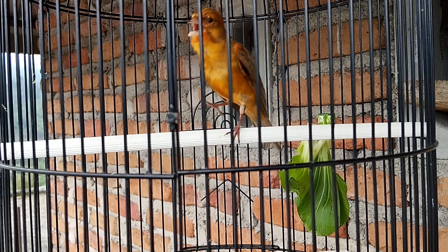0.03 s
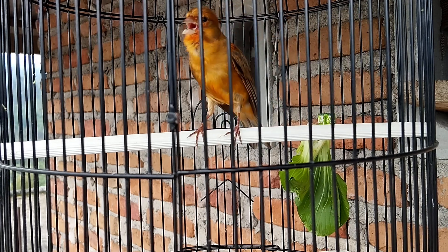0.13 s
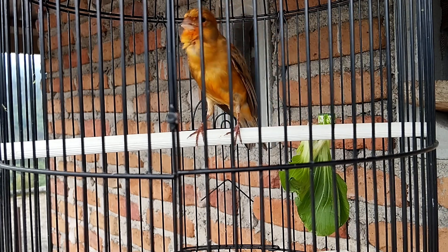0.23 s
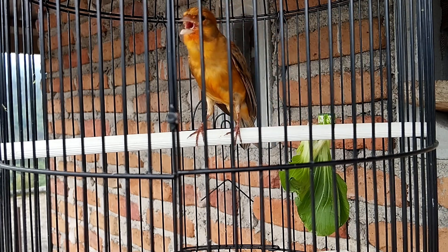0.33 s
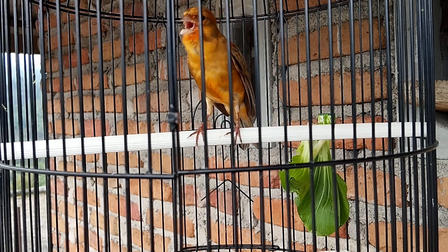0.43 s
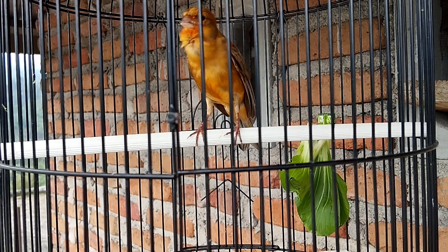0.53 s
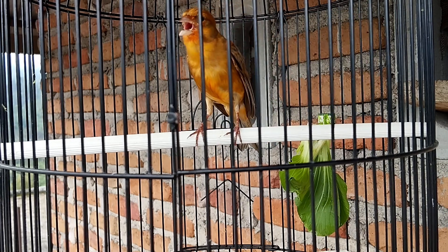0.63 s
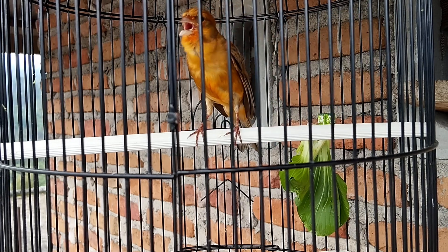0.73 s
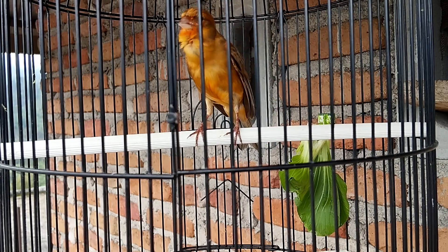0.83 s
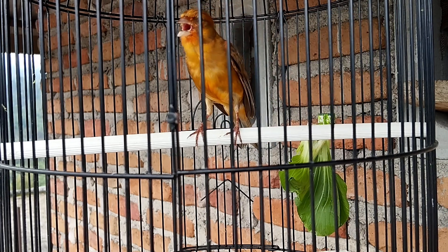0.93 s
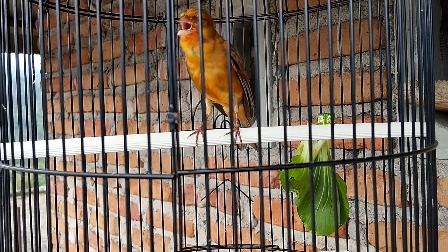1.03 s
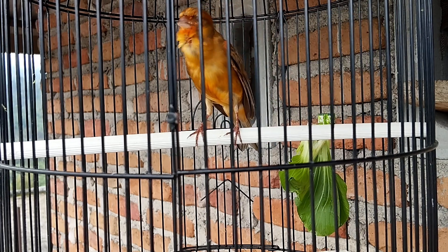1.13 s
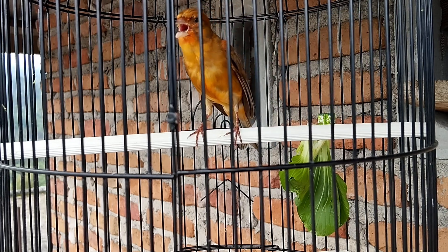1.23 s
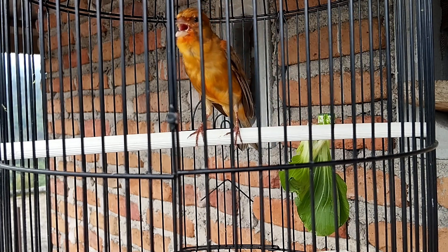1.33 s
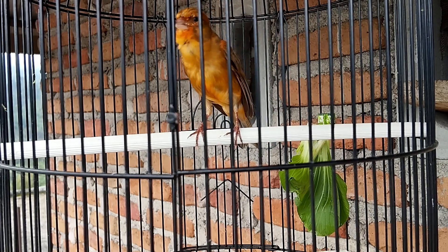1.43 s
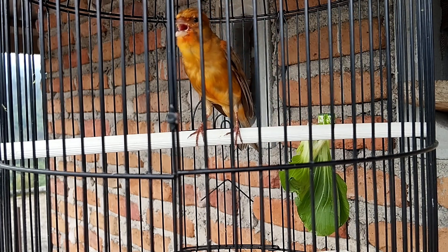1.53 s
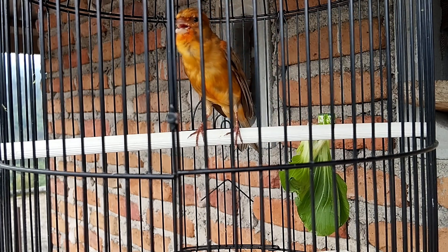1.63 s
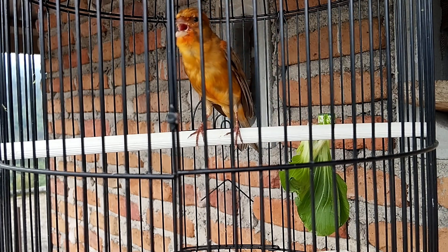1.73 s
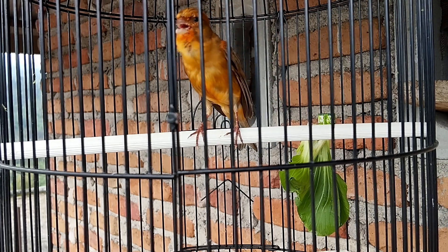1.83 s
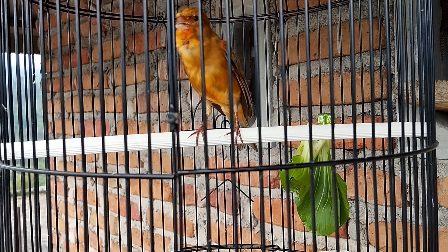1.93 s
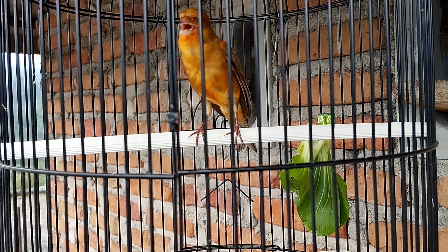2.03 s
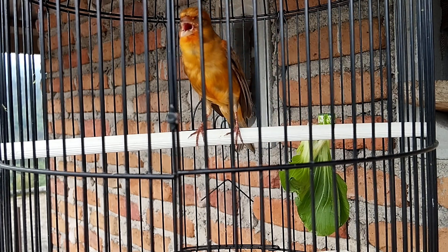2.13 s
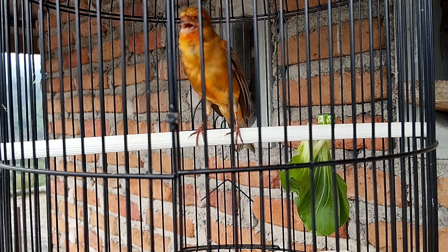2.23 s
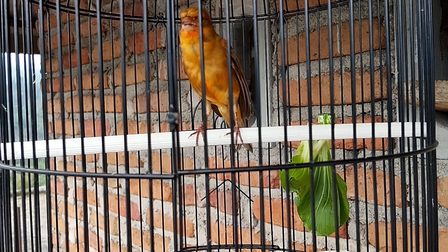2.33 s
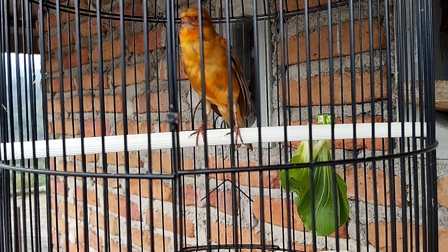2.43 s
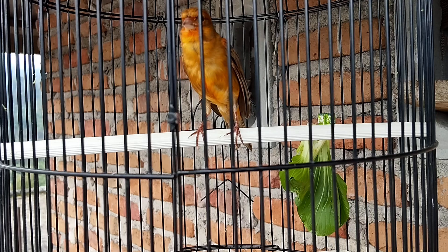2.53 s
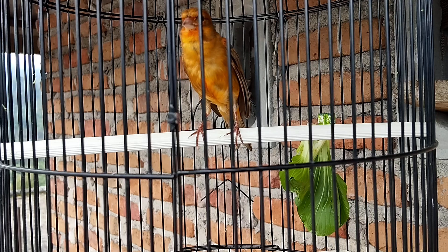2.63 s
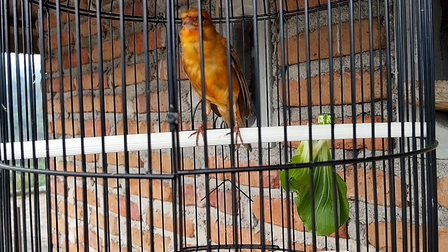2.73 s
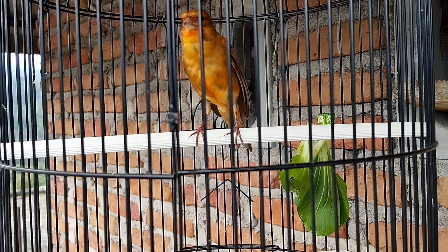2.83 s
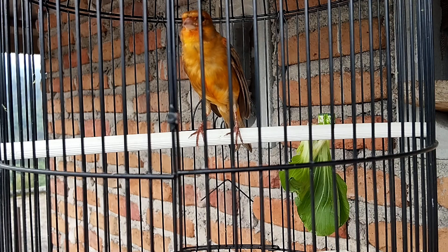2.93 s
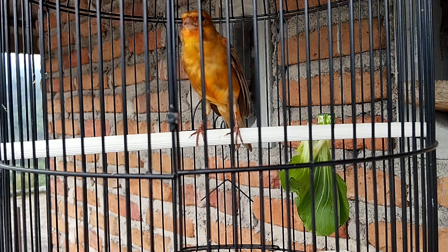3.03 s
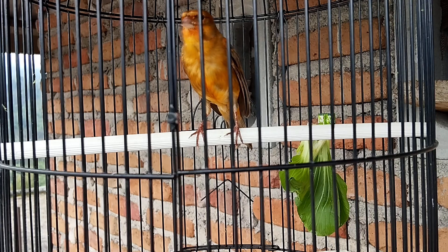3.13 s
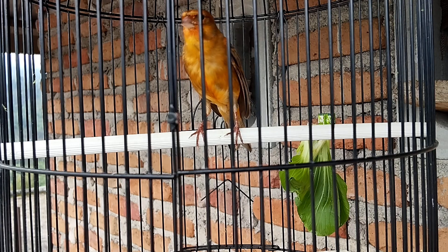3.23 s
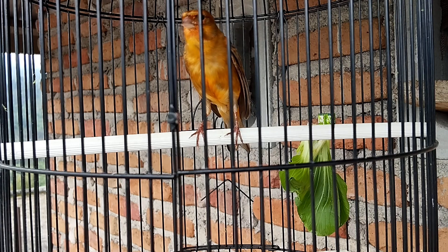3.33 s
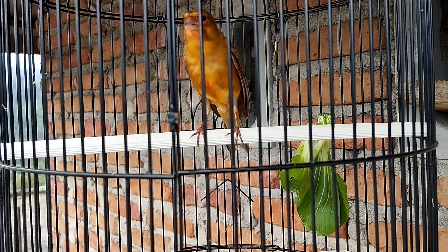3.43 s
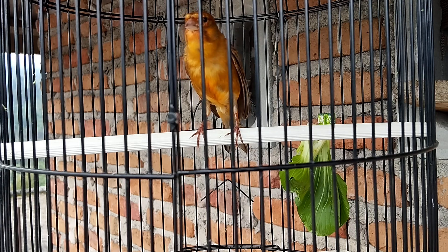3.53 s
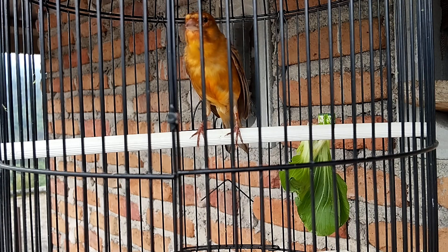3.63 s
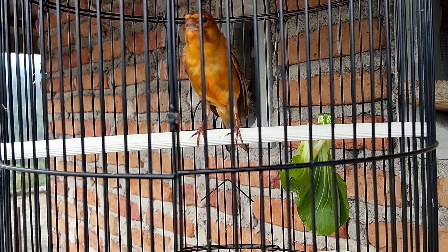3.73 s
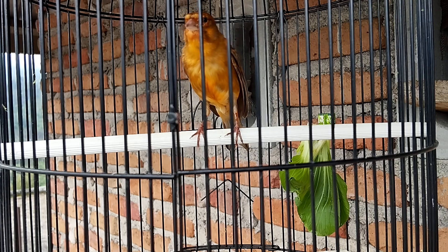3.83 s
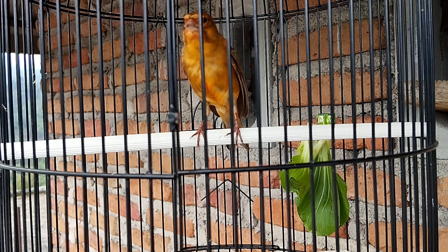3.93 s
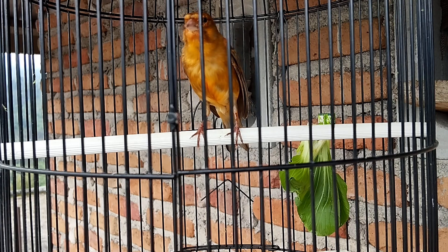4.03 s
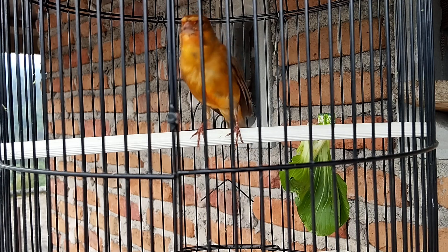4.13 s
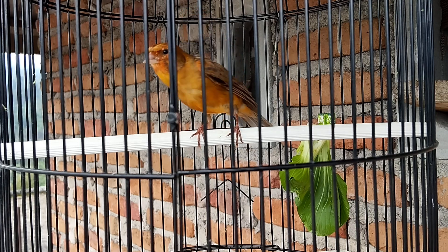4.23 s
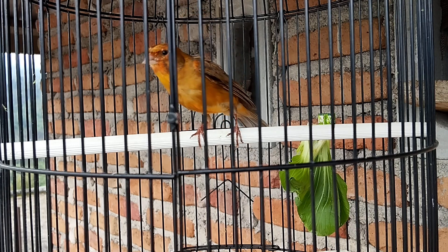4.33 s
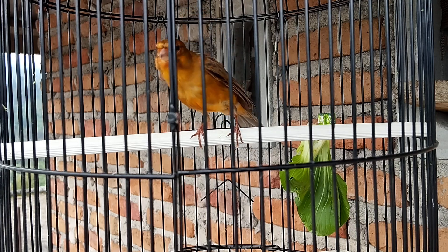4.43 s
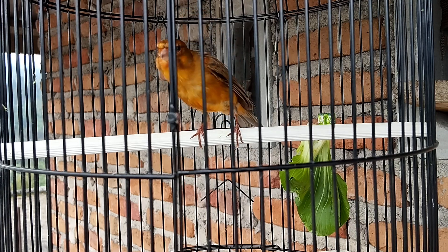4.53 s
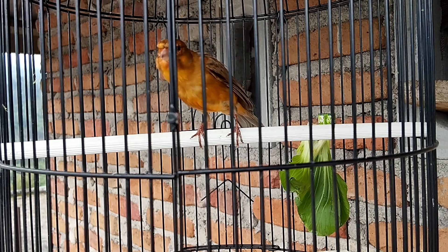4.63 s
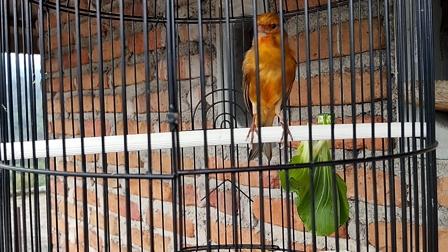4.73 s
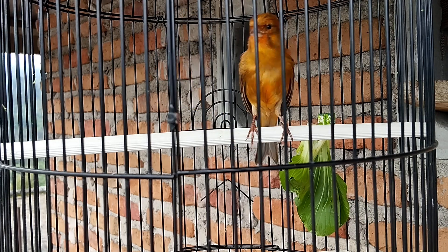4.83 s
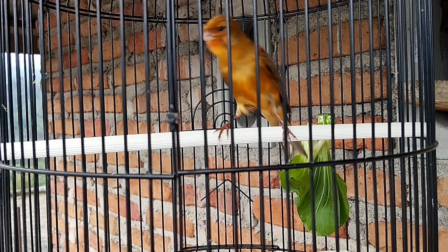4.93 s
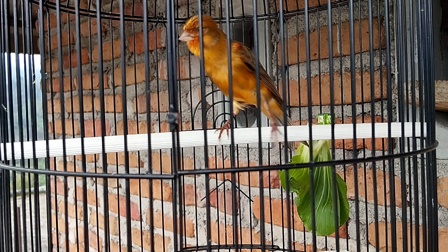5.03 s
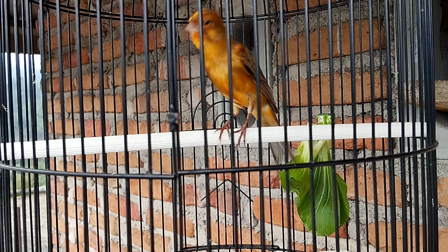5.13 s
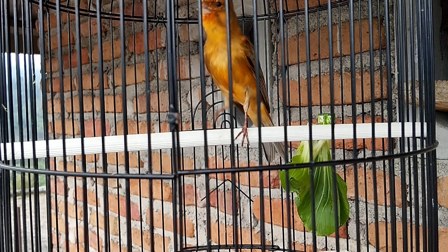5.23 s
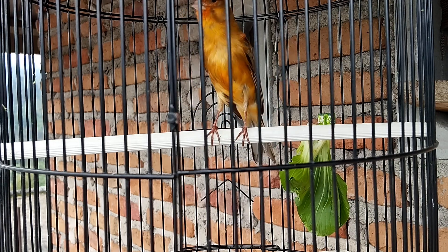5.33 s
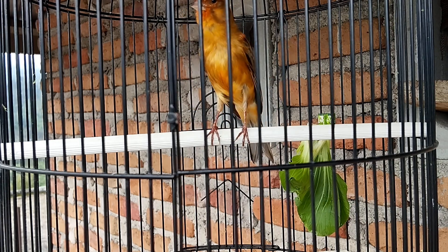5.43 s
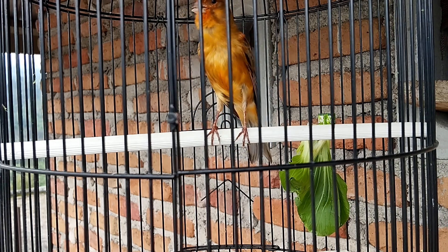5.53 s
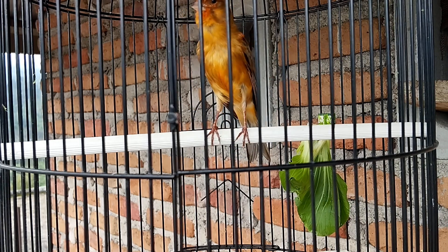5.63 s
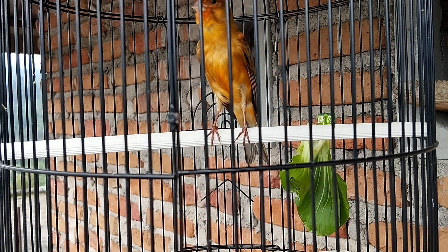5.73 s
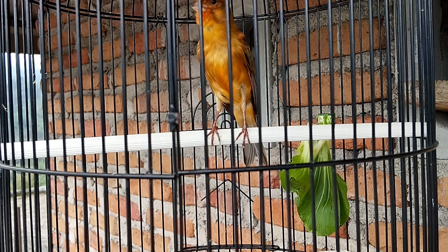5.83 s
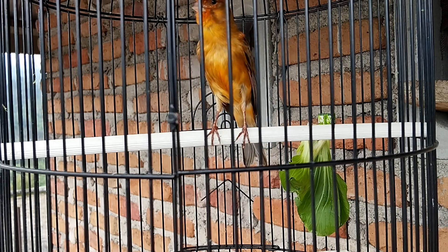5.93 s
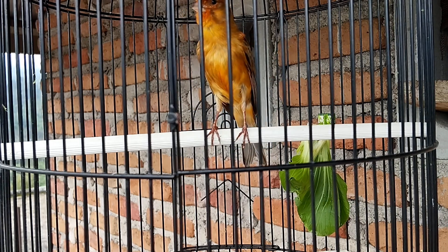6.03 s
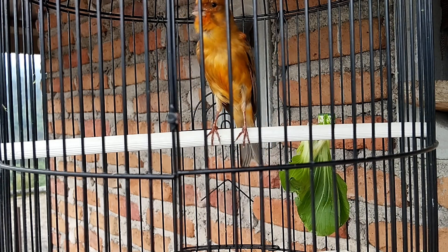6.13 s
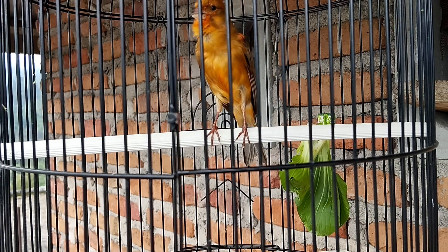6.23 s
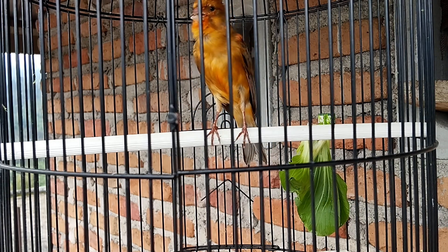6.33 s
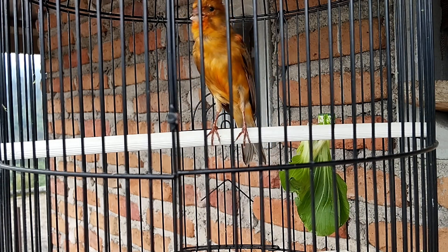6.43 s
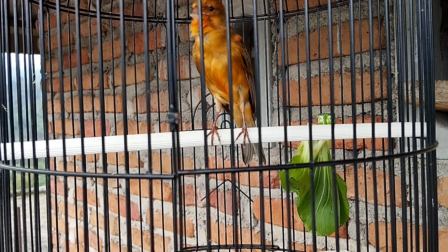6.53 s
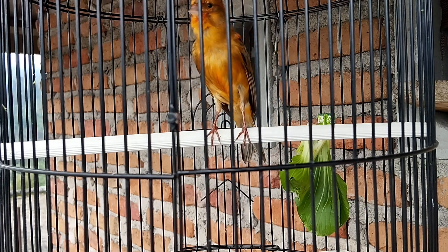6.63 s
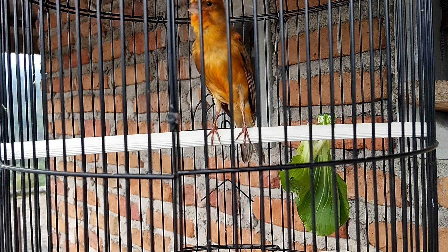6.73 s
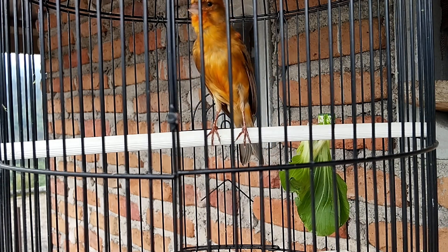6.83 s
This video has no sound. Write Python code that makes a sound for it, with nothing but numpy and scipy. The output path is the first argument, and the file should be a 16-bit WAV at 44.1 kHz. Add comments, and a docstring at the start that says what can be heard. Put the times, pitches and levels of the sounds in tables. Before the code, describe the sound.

A canary sings very close, loud and piercing, with short hard reflections from a brick wall and cage. The first falling whistle is already under way; six more follow at about 0.1, 0.4, 0.7, 1.0, 1.3 and 1.6 seconds, each sliding from very high to a lower plunge, the last broken off with a small upward hook. From 1.8 to 2.4 seconds five quick whistles scoop and flick upward. Then the song stops, leaving faint distant bird chatter, echo-blurred whistles and thin high tones. Small close chirps come at 3.6, 4.2 and 5.5 seconds, a rough two-voiced call at 5.6, and a longer, overtone-rich rising call from 6.2 to 6.7. Soft air, a weak fading low hum and gently swelling street rumble run throughout, heard in phone stereo.

```python
"""Over faint hum, swelling street rumble, far birds and thin high tones, a caged canary near a brick wall whistles
falling notes, then quick rising ones, pauses with short chirps, a rough two-voiced call and a long rising call.
The canary is gliding tones with overtones, rasp and close echoes of wall and cage; the far sounds are plain
tones smeared by echoes; hum, rumble and air are shaped noise. A phone with two ports hears it all."""
import sys
import numpy as np
from scipy import signal
from scipy.fft import rfft, irfft
from scipy.io import wavfile
from scipy.ndimage import uniform_filter1d, minimum_filter1d

SR = 44100
rng = np.random.default_rng(int(sys.argv[2]) if len(sys.argv) > 2 else 0)


def output_pcm(signal):
    """Save a mono or channel-first signal as 16-bit PCM at the path in sys.argv[1].

    Samples are clipped to [-1, 1] before scaling.
    """
    pcm = np.clip(np.atleast_2d(signal).T, -1, 1) * 32767
    wavfile.write(sys.argv[1], SR, np.round(pcm).astype(np.int16))


N = 302967
TOP_HZ = 15850  # the phone's upper limit, also where canary overtones have faded out


def undb(db):
    """Decibels as an amplitude factor."""
    return 10 ** (np.asarray(db) / 20)


def colour(hz, table):
    """Gain of a (pitch_hz, gain_db) table at the given frequencies, drawn over log frequency."""
    table_hz, gain_db = np.transpose(table)
    return undb(np.interp(np.log(np.maximum(hz, 1)), np.log(table_hz), gain_db))


def curve(table):
    """A (time_s, level_db) table as gain for every sample."""
    return undb(np.interp(np.arange(N) / SR, *np.transpose(table)))


def shaped(gain, channels):
    """Unrelated noises of rms 1 with the spectrum gain(hz)."""
    spectrum = rfft(rng.standard_normal((channels, N)))
    noise = irfft(spectrum * gain(np.arange(N // 2 + 1) * SR / N), N)
    return noise / noise.std()


def walk(rate_hz):
    """Slow random level walk, spread 1."""
    return shaped(lambda f: 1 / (1 + (f / rate_hz) ** 2), channels=1)[0]


def smooth_noise(count, size):
    """White noise averaged twice over size samples: a small random wobble."""
    return uniform_filter1d(uniform_filter1d(rng.standard_normal(count), size=size), size=size)


def tail(level_db, t60_s):
    """Dense decaying echoes, different at each port."""
    t = np.arange(SR) / SR
    echoes = rng.standard_normal((2, SR)) * undb(-60 * t / t60_s)
    echoes = echoes * np.minimum(t / 0.0014, 1)  # soft start
    return undb(level_db) * echoes / np.sqrt(np.sum(echoes ** 2) / 2)


def add(out, start_s, sound):
    """Mix a sound in at a time in seconds, cutting what falls outside the scene."""
    i = int(round(start_s * SR))
    sound = sound[..., max(-i, 0):N - i]
    out[..., max(i, 0):max(i, 0) + sound.shape[-1]] += sound


# spectrum of the steady air: pitch_hz, relative_level_db (per Hz)
AIR_SPECTRUM = [(25, -9.5), (50, -4), (80, -3.5), (160, -10), (300, -13), (500, -23), (900, -26),
                (1600, -33.5), (2500, -33), (5000, -34.5), (6500, -31.5), (8000, -46), (10000, -62),
                (13000, -74.5), (15500, -90.5)]
# street rumble, mean levels of three bass bands: time_s, deepest_db, middle_db, upper_db
RUMBLE_LEVELS = [(0.0, -57, -49, -52), (0.31, -61, -47.5, -63), (0.88, -54.5, -54.5, -61),
                 (2.18, -63, -53, -68), (2.28, -65.5, -62.5, -71), (4.71, -58.5, -65, -61.5),
                 (4.94, -72.5, -58.5, -57.5), (6.81, -66, -52, -59), (6.87, -83, -57.5, -76)]
# fading hum: time_s, level_db
HUM_LEVELS = [(0, -63), (3.6, -65), (6.87, -72)]
HUM_HZ, AIR_DB = 202.4, -57


def street():
    """Steady air, swelling rumble and a wavering hum, all from noise; the bass is alike at both ports."""
    apart = np.array([[1], [-1]])
    mid = shaped(lambda f: colour(f, AIR_SPECTRUM), channels=1)
    side = shaped(lambda f: colour(f, AIR_SPECTRUM) * np.clip(f / 600, .2, 1), channels=1) * .3
    out = undb(AIR_DB + 0.43 * walk(.5)) * (mid + side * apart)
    time_s, *levels = np.transpose(RUMBLE_LEVELS)
    for level_db, (centre_hz, width_hz) in zip(levels, [(33, 18), (72, 30), (135, 50)]):
        rumble = shaped(lambda f: np.exp(-((f - centre_hz) / width_hz) ** 2), channels=2)
        swell = curve(np.transpose([time_s, level_db])) * undb(1.5 * walk(2.7))
        out = out + swell * (rumble[0] + .15 * rumble[1] * apart)
    hum = shaped(lambda f: 1 / (1 + ((f - HUM_HZ) / 7) ** 2), channels=1)
    return out + curve(HUM_LEVELS) * hum


def far_tone(length_s, first_hz, middle_hz, last_hz, level_db, left_minus_right_db):
    """A plain tone led through three pitches that flutters in the moving air."""
    u = np.arange(0, length_s, 1 / SR) / length_s
    hz = np.polyval(np.polyfit([0, .5, 1], [first_hz, middle_hz, last_hz], 2), u)
    hz += 0.092 * (last_hz - first_hz) * np.sin(2 * np.pi * u)  # steep at both ends, flatter between
    flutter = 1 + 8.0 * smooth_noise(len(u), 80)
    tone = np.sin(2 * np.pi * np.cumsum(hz) / SR) * np.sin(np.pi * u) ** 0.32 * flutter
    return tone * undb(level_db + np.array([[left_minus_right_db], [-left_minus_right_db]]) / 2)


# chatter of far birds, before the far echoes blur it: time_s, level_db
CHATTER_LEVELS = [(0, -58.5), (2.6, -66), (2.9, -70.5), (3.0, -58), (3.3, -64), (4.1, -63), (4.75, -70.5),
                  (5.3, -68), (6.87, -67)]


def far_chatter():
    """A random crowd of short gliding chirps, levelled as one."""
    chatter = np.zeros((2, N))
    for when, length, pitch, glide, size, side in rng.random((1600, 6)):
        hz, step, length_s = 2400 * 2.6 ** pitch, .9 + .13 * glide, .008 + .025 * length
        chirp = far_tone(length_s, hz, hz * step, hz * step ** 2, 5 * size, 8 * side - 6)
        add(chatter, when * N / SR, chirp)
    return chatter / chatter.std() * curve(CHATTER_LEVELS)


# far whistles and a few faint, thin, steady high tones, levels before the split into direct and echoed sound:
# start_s, direct_share (0-1), length_s, first_hz, middle_hz, last_hz, level_db, left_minus_right_db
FAR_TONES = [(0.973, 0.437, 0.105, 6050, 6070, 6100, -54, -12.5),
             (1.267, 0.113, 0.1144, 680, 605, 539.7, -61, -0.5),
             (1.398, 0.55, 0.19, 950, 951.6, 920.6, -54, 4),
             (1.542, 0.242, 0.148, 900, 770.7, 684.3, -50.5, 0.5),
             (1.998, 0.16, 0.159, 820, 769.3, 826, -54, -2.5),
             (2.461, 0.38, 0.118, 6350, 6350, 6250, -61.5, -12.5),
             (2.723, .1, .12, 5900, 5607, 5070, -61.5, 2.5),
             (2.97, 0.24, 0.0192, 6300, 5810, 5000, -49, -9),
             (2.979, 0.594, 0.0295, 5140, 4850, 4750, -46, -7.5),
             (3.033, 0.54, .047, 5100, 4830, 4720, -51.5, -7.5),
             (3.042, 0.436, .05, 4400, 4020, 3905, -51, -4.5),
             (3.085, 0.594, 0.0296, 4950, 4743, 4796, -46, -6),
             (3.328, 0.73, .018, 2100, 2750, 3300, -52, -13),
             (3.339, .8, 0.034, 4200, 4300, 4077, -58, -11.5),
             (3.348, 0.69, 0.027, 2900, 3041, 2950, -52.5, -4),
             (3.64, 0.31, 0.0205, 4600, 4820, 5847, -42, -8.5),
             (3.678, .9, 0.029, 4400, 4518, 4786, -49.5, -3.5),
             (3.688, .25, 0.159, 3790, 3483, 3640, -51, -7.5),
             (3.904, 0.318, .11, 2550, 2645, 2705, -58, 2.5),
             (4.099, 0.338, 0.072, 1706, 1580, 1477, -60.5, 6.5),
             (4.267, 0.363, 0.0463, 4500, 4150, 3805, -50.5, -7),
             (4.423, 0.101, .18, 3634, 3450, 3323, -47, -0.5),
             (4.535, 0.122, .073, 5200, 4571, 4150, -51.5, -7),
             (4.779, 0.346, 0.4464, 6050, 6050, 6060, -71.5, -15),
             (4.933, 0.644, 0.138, 4750, 3440, 2660, -52.5, -5),
             (5.195, .2, .148, 6200, 5090, 4230, -52.5, -7),
             (5.547, 0.56, 0.107, 3750, 3148, 3026, -52.5, -7.5),
             (5.781, 0.513, 0.134, 6500, 6490, 6380, -68.5, -15.5),
             (5.818, 0.2215, 0.108, 5200, 4552, 4140, -56.5, -3),
             (6.065, 0.63, 0.1263, 4520, 3439, 2430, -54, -4),
             (6.092, 0.37, 0.059, 6500, 6384, 6420, -61, -13),
             (6.151, 0.35, 0.0414, 5000, 4940, 4600, -54, -4.5),
             (6.682, 0.91, 0.097, 3900, 3200, 2687, -54.5, -1)]


def far_sounds():
    """Chatter, whistles and thin high tones smeared by distance: the less direct a tone, the more it echoes."""
    direct, echoed = np.zeros((2, 2, N))
    for start_s, direct_share, *note in FAR_TONES:
        tone = far_tone(*note)
        add(direct, start_s, direct_share * tone)
        add(echoed, start_s, np.sqrt(max(1.2 - direct_share, 0)) * tone)
    smear = tail(level_db=1, t60_s=0.32)
    return direct + signal.fftconvolve(0.37 * echoed + far_chatter(), smear, axes=1)[:, :N]


# resonance of the canary's throat and beak: pitch_hz, gain_db
THROAT_GAIN = [(1100, -29), (2200, -14.5), (3200, -3.5), (4000, -2), (5000, -7.5), (6200, -18.5),
               (7500, -24), (9000, -27), (16000, -35)]


def syrinx(rows, overtones_db, follow):
    """One note: a gliding membrane tone with overtones, coloured by the throat; unsteady airflow makes it rasp.

    Columns of rows: time_s, pitch_hz, level_db (before the throat), overtones_db, rasp (0-1).
    """
    time_s, *columns = np.transpose(rows)
    t = np.arange(time_s[0], time_s[-1], 1 / SR)
    hz, level_db, over_db, rasp = (
        uniform_filter1d(np.interp(t, time_s, c), size=200, mode="nearest") for c in columns)
    hz = hz * (1 + 0.11 * smooth_noise(len(t), 250))  # the pitch trembles
    phase = 2 * np.pi * np.cumsum(hz) / SR
    tone = colour(hz, THROAT_GAIN) * np.sin(phase)
    # with follow above 0 the overtones grow with the fundamental's strength, roughened by noise
    drive = undb(over_db) * colour(hz, THROAT_GAIN) ** follow
    drive = drive * (1 + 5 * follow * smooth_noise(len(t), 24))
    for k, step_db in enumerate(overtones_db, 2):
        fade = np.clip((TOP_HZ - k * hz) / 300, 0, 1)
        strength = fade * drive * undb(step_db) * colour(k * hz, THROAT_GAIN)
        tone = tone + strength * np.sin(k * phase)
    airflow = 1 + 4.0 * rasp * smooth_noise(len(t), 9)
    edge = np.clip(np.minimum(t - time_s[0], time_s[-1] - t) / 0.0041, 0, 1)
    return np.sqrt(2) * undb(level_db) * tone * airflow * edge


# overtones of the song from the second harmonic up: gain_db
SONG_OVERTONES = [-15.5, -11.5, -18]


def sing(out, notes):
    """Mixes in clear whistles whose overtones follow the strength of the fundamental."""
    for rows in notes:
        add(out, rows[0][0], syrinx(rows, SONG_OVERTONES, follow=.8))


def whistled(shape, start_s, length_s, effort_db, opening_db, closing_db, *sharp):
    """One whistle: the shape stretched and tuned a little; slack membranes at low pitch rasp more."""
    share, hz, level_db = np.transpose(shape)
    hz = hz * 2 ** (np.interp(share, [0, .15, .45, .8, 1], [*sharp, 0]) / 12)
    extra_db = np.interp(share, [0, 1 / 3, 3 / 4, 1], [opening_db, 0, 0, closing_db])
    level_db = effort_db + level_db + extra_db
    rasp = np.minimum(0.005 * (4000 / hz) ** 5, .1)
    return np.transpose([start_s + length_s * share, hz, level_db, 0 * share, rasp])


def broken_off(rows):
    """The whistle stops at three quarters of its length, with a short upward hook."""
    time_s = rows[:, 0]
    stop_s = time_s[0] + .75 * (time_s[-1] - time_s[0])
    last = np.array([np.interp(stop_s, time_s, c) for c in rows.T])
    hook = last + [.018, 450, -6, 0, 0]  # s later, Hz up, dB softer
    return np.vstack([rows[time_s < stop_s], last, hook])


# a falling whistle, a long slide that ends in a plunge: share_of_length (0-1), pitch_hz, relative_effort_db
FALLING_SHAPE = [(0, 7750, -16.5), (.04, 7604, -10.5), (.09, 7200, -7), (.19, 6450, -4.5), (.28, 5776, 0),
                 (.38, 5354, 1), (.57, 4493, -0.5), (.76, 3846, -2.5), (.85, 3500, -7), (.91, 2900, -7.5),
                 (.955, 2150, -5.5), (1, 1300, -12)]
# falling whistles, the first already under way: start_s, length_s, effort_db, extra_at_start_db, extra_at_end_db,
# then semitones sharp: at_start_st, early_st, midway_st, late_st
FALLING_NOTES = [(-.219, .245, -3, .1, -2, .1, .1, .1, .1),
                 (.083, 0.27995, -8, 3, -1, 0.23, -.5, -.6, -0.66),
                 (.42, 0.24775, -7.5, 0, -2.5, -.2, -.3, -0.413, 0.156),
                 (.724, 0.2314, -6.5, 0.5, 0, 0.37, .2, -0.232, -.1),
                 (1.021, .243, -8, 2, 3, .1, .3, 0.371, 0.19), (1.33, 0.2126, -8, 0, 4, .1, .7, .8, .1),
                 (1.609, 0.1914, -7, -0.5, -0.02, -0.73, -.2, 0.582, -0.393)]


def falling_whistles(out):
    """Membrane tone slides down through each whistle; the last breaks off before its plunge and hooks up."""
    *falls, last = (whistled(FALLING_SHAPE, *note) for note in FALLING_NOTES)
    sing(out, falls + [broken_off(last)])


# the other half of the syrinx joins in: start_s, length_s, first_hz, last_hz, effort_db
JOINING_TONES = [(0.905, 0.0283, 3123, 2932, -18.5), (1.205, .03, 3350, 3201, -16.5),
                 (1.497, 0.032, 3039, 2856, -23.5), (1.972, .028, 4750, 4550, -9)]


def joining_half(out):
    """Here and there the other half of the syrinx adds a short tone that beats with the first."""
    sing(out, [[(start_s, first_hz, effort_db, 0, 0), (start_s + length_s, last_hz, effort_db, 0, 0)]
               for start_s, length_s, first_hz, last_hz, effort_db in JOINING_TONES])


# a rising whistle, a scoop, a climb and a flick: share_of_length (0-1), pitch_hz, relative_effort_db
RISING_SHAPE = [(0, 1400, -15.5), (.08, 2560, -13.5), (.18, 3050, -18.5), (.4, 3710, -5.5),
                (.62, 4430, -5.5), (.83, 5050, 1.5), (1, 5900, -5.5)]
# rising whistles: start_s, length_s, effort_db, extra_at_start_db, extra_at_end_db,
# then semitones sharp: at_start_st, early_st, midway_st, late_st
RISING_NOTES = [(1.795, 0.1036, -7, 1, -0.5, .1, .3, -.2, -0.3),
                (1.922, 0.10604, -6.5, -0.53, 2, .1, -.1, .2, .1),
                (2.048, 0.10786, -5.5, .5, 0, .1, -.3, -.1, .3),
                (2.184, 0.1067, -6.5, -0.71, -3.5, 0.11, .1, .1, -0.19),
                (2.314, 0.11273, -6.5, 1, -7, -.1, .1, -.1, -.2)]


def rising_whistles(out):
    """Quick whistles whose membrane tone scoops, climbs and flicks up."""
    sing(out, [whistled(RISING_SHAPE, *note) for note in RISING_NOTES])


# calls start hoarse and clear: share_of_length (0-1), rasp (0-1)
HOARSENESS = [(0, 0.67), (0.069, 0.12), (.17, 0.11), (.26, 0.01)]


def hoarse(rows, least_rasp):
    """Adds the rasp of a call: rough at the onset, never less than least_rasp."""
    time_s, *columns = np.transpose(rows)
    share, rasp = np.transpose(HOARSENESS)
    rasp_s = time_s[0] + share * (time_s[-1] - time_s[0])
    t = np.union1d(time_s, rasp_s)
    rasp = np.maximum(np.interp(t, rasp_s, rasp), least_rasp)
    return np.transpose([t, *(np.interp(t, time_s, c) for c in columns), rasp])


# overtones of chirps and calls from the second harmonic up: gain_db
CALL_OVERTONES = [1.5, -6.5, -11.5, -10, -14.5, -17, -22, -13, -17.5, -27.5]


def call(out, rows, least_rasp=0):
    """Mixes in one hoarse-starting voice whose overtones have levels of their own."""
    add(out, rows[0][0], syrinx(hoarse(rows, least_rasp), CALL_OVERTONES, follow=0))


# short chirps, levels before the throat: start_s, turn_s, end_s, start_hz, turn_hz, end_hz,
# start_db, turn_db, end_db, overtones_at_start_db, overtones_at_end_db
ARCHED_CHIRPS = [(3.562, 3.576, 3.606, 3395, 3848, 2965, -42.5, -25.5, -27.5, -1.5, -8),
                 (4.197, 4.215, 4.242, 2459, 3149, 2876, -37.5, -25.5, -19.5, 9, -18),
                 (5.503, 5.514, 5.527, 1152, 1430, 1106, -23.5, -24, -13.5, -21, -27.5)]


def chirps(out):
    """Short chirps whose membrane tone arches up and back."""
    for chirp in ARCHED_CHIRPS:
        time_s, hz, level_db = chirp[:3], chirp[3:6], chirp[6:9]
        over_db = np.interp(time_s, time_s[::2], chirp[9:])
        call(out, np.transpose([time_s, hz, level_db, over_db]))


# both halves of the syrinx and their sum tone, one list a voice:
# time_s, pitch_hz, level_db (before the throat), overtones_db
DOUBLE_VOICES = [
    [(5.627, 1880, -34, -24.5), (5.645, 2130, -28.5, -4.5), (5.66, 2350, -24.5, -8.5),
     (5.675, 3083, -32.5, -12.5), (5.703, 3344, -46, -2.5)],
    [(5.628, 2590, -35.5, -3.5), (5.648, 3030, -33.5, -6), (5.66, 3360, -48, 1), (5.671, 3873, -32.5, -5.5),
     (5.706, 3803, -45.5, -14)],
    [(5.627, 4470, -36, -20), (5.645, 4950, -49, -20), (5.662, 5240, -36.5, -10)],
]


def double_call(out):
    """A rough call: both halves of the syrinx sound at once, with their sum tone."""
    for voice in DOUBLE_VOICES:
        call(out, voice, least_rasp=.11)


# the long rising call: time_s, pitch_hz, level_db (before the throat), overtones_db
RISING_CALL_CURVE = [(6.222, 1167, -25.5, -11.5), (6.255, 1514, -26.5, -2), (6.3, 1695, -29, -4),
                     (6.325, 1856, -25, -2), (6.345, 1946, -20, -3), (6.39, 2030, -30, 4),
                     (6.44, 2144, -25.5, 2), (6.49, 2269, -27.5, 6.5), (6.53, 2420, -24.5, 2.5),
                     (6.58, 2638, -24.5, 1.5), (6.62, 2834, -20, -7.5), (6.68, 3018, -21.5, -31),
                     (6.7, 3070, -59, -7)]


def rising_call(out):
    """A long climb in pitch with strong, changing overtones."""
    call(out, RISING_CALL_CURVE)


def canary():
    """The song, then the chirps and calls; so small a body radiates no bass."""
    out = np.zeros(N)
    for part in (falling_whistles, joining_half, rising_whistles, chirps, double_call, rising_call):
        part(out)
    return signal.sosfilt(signal.butter(4, 1100, "high", fs=SR, output="sos"), out)


# direct path and echoes off wall, perch and cage floor, left port then right port: delay_ms, gain
ECHO_PATHS = [
    [(0.0, 0.916), (0.64, -0.085), (1.18, 0.057), (1.35, -0.16), (1.68, -0.082), (2.05, 0.047),
     (2.46, -0.49), (2.73, 0.0022), (3.02, 0.19), (4.36, -0.0027), (5.5, -0.2)],
    [(0.16, 1.0), (0.82, -0.13), (1.34, -0.23), (2.22, -0.35), (2.5, -0.22), (2.84, 0.04), (3.6, -0.071),
     (4.22, -0.35), (4.5, 0.13), (4.86, 0.17), (5.59, 0.22)],
]


def nook(dry_canary):
    """Direct sound, single echoes, the quick ring of the corner and the faint long tail of the yard."""
    f = np.arange(SR // 2 + 1)
    # delays as phase turns, so they can fall between samples
    paths = np.array([irfft(sum(gain * np.exp(-2j * np.pi * f * delay_ms / 1000) for delay_ms, gain in port), SR)
                      for port in ECHO_PATHS])
    paths = paths * (np.arange(SR) < SR // 20)
    corner, yard = tail(level_db=-6.5, t60_s=0.094), tail(level_db=-35, t60_s=.9)
    return signal.fftconvolve(dry_canary[None], paths + corner + yard, axes=1)[:, :N]


def scene():
    """Street and far sounds around the canary in its nook."""
    return street() + far_sounds() + nook(canary())


# treble notches and peak of the microphone ports: pitch_hz, gain_db
PORT_COLOUR = [(9000, 0), (9950, -16), (11000, -4), (12600, -1), (13500, -14), (14300, 6), (15500, 17)]
# the left port is brighter in the high treble: pitch_hz, left_minus_right_db
LEFT_BRIGHTNESS = [(7000, -.3), (12000, 5)]
LIMIT = .8  # peak amplitude held by the limiter, full scale 1


def record(dry):
    """The capsule rounds loud peaks, the ports colour the treble, a limiter holds peaks, the phone cuts the top."""
    rounded = np.tanh(0.3002 * dry) / 0.3087
    hz = np.arange(N // 2 + 1) * SR / N
    balance = colour(hz, LEFT_BRIGHTNESS) ** np.array([[.5], [-.5]])
    coloured = irfft(rfft(rounded) * colour(hz, PORT_COLOUR) * balance, N)
    needed = LIMIT / np.maximum(np.abs(coloured).max(axis=0), LIMIT)
    gain = uniform_filter1d(minimum_filter1d(needed, size=441), size=441)  # glides in ahead of each peak
    return signal.sosfilt(signal.ellip(8, .2, 70, TOP_HZ, fs=SR, output="sos"), gain * coloured)


dry = scene()
out = record(dry)
output_pcm(out)
```